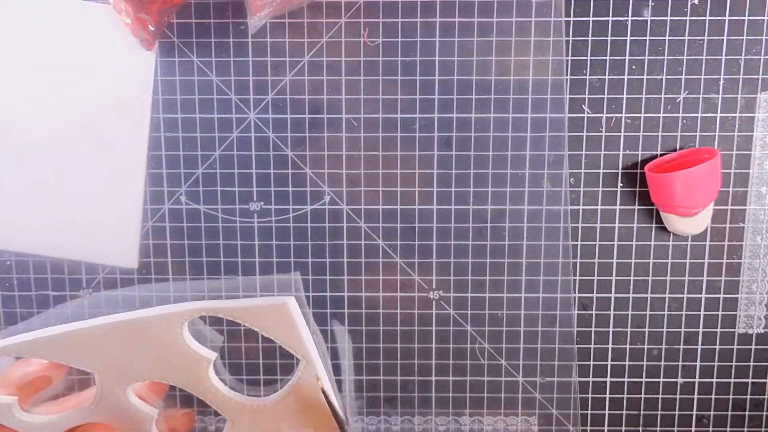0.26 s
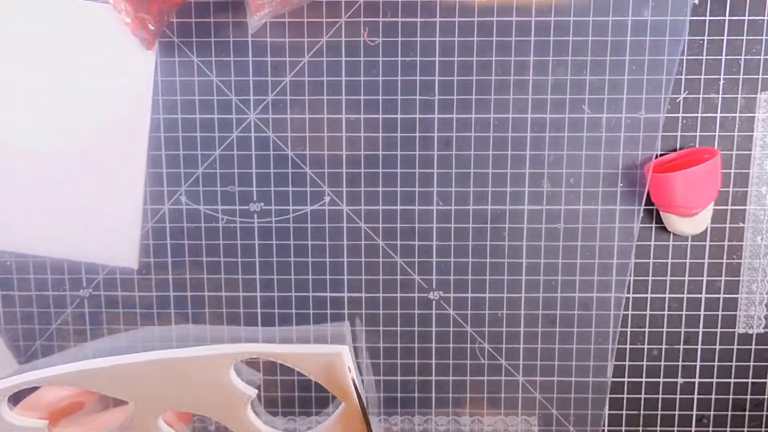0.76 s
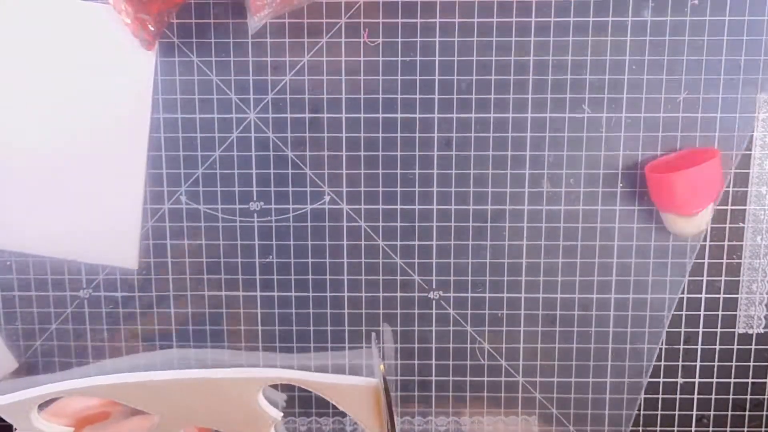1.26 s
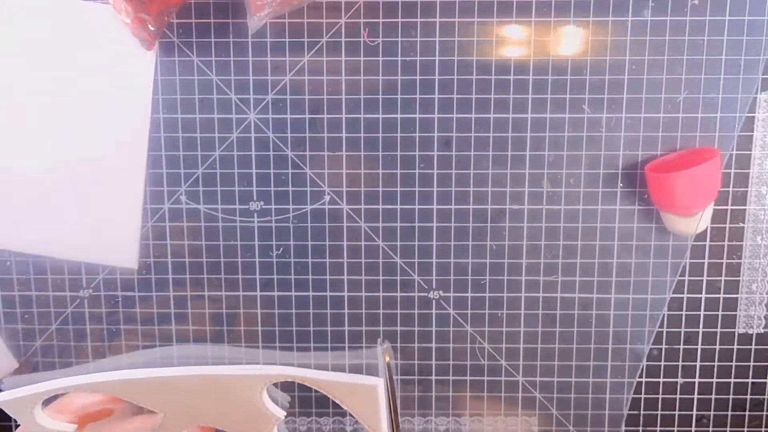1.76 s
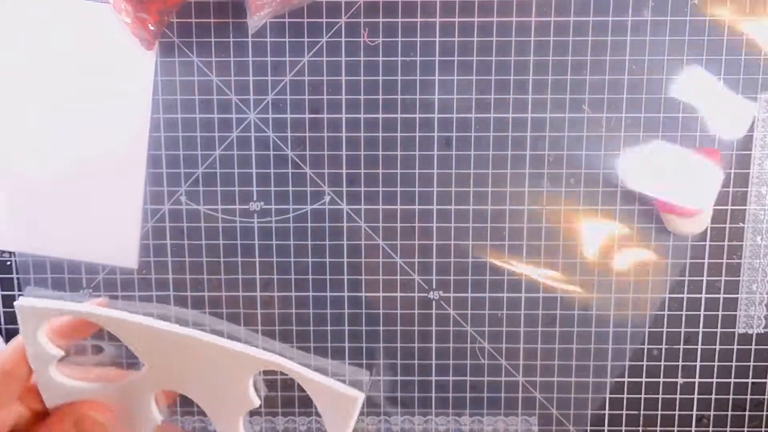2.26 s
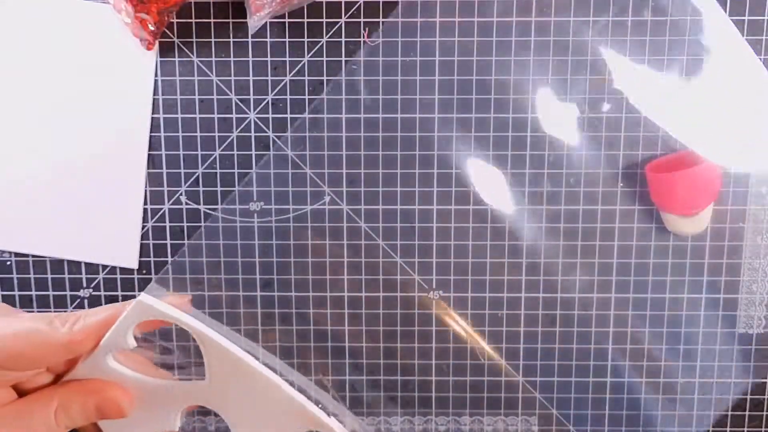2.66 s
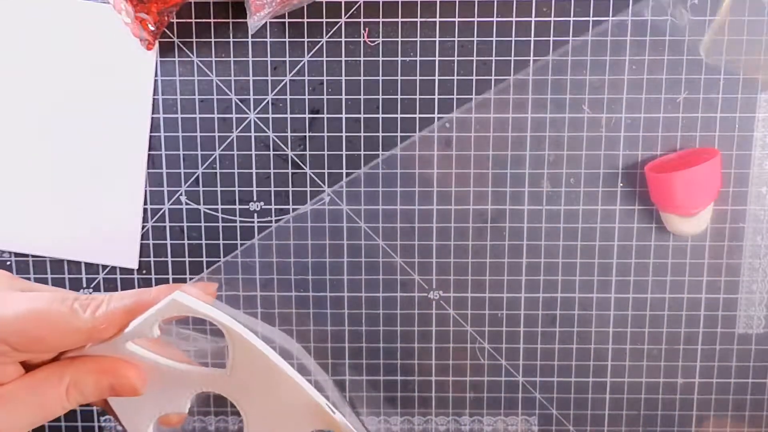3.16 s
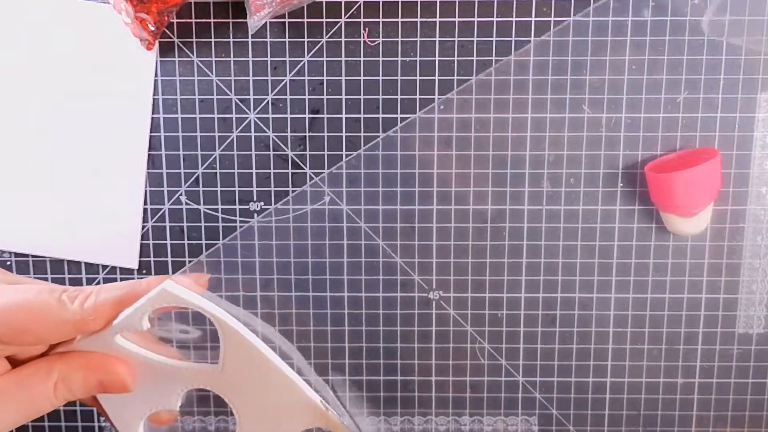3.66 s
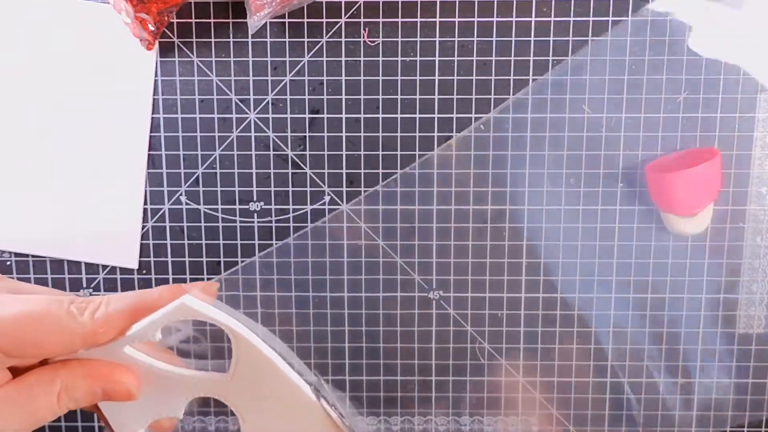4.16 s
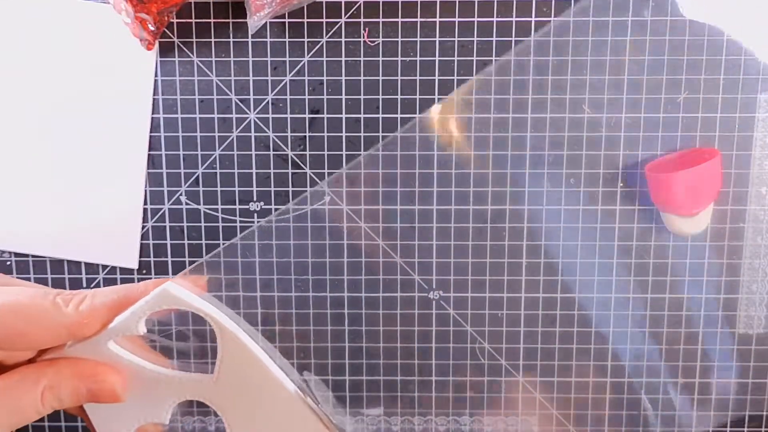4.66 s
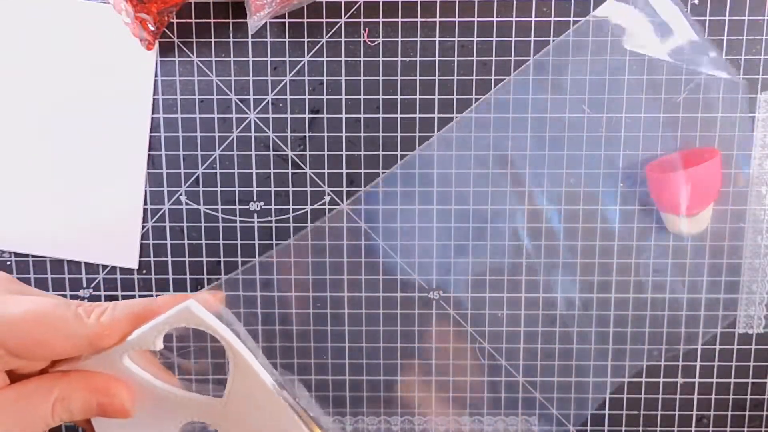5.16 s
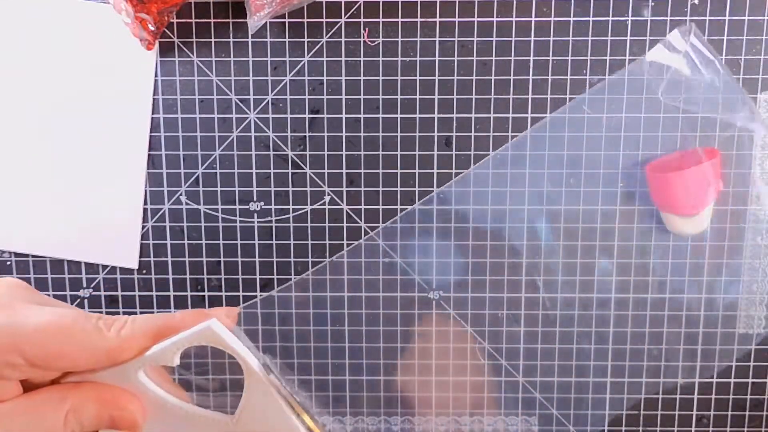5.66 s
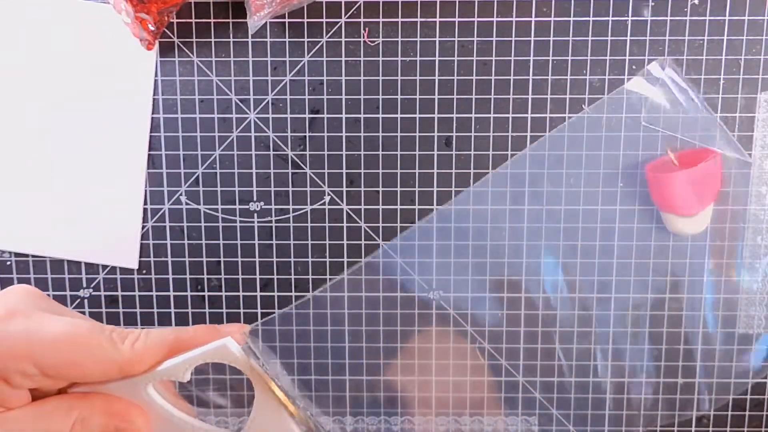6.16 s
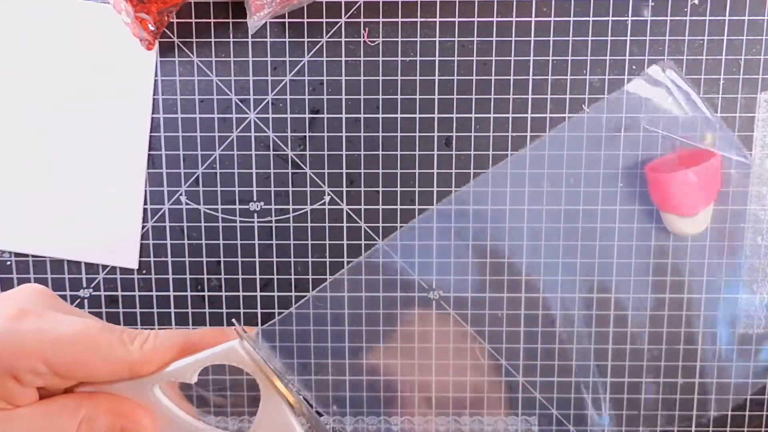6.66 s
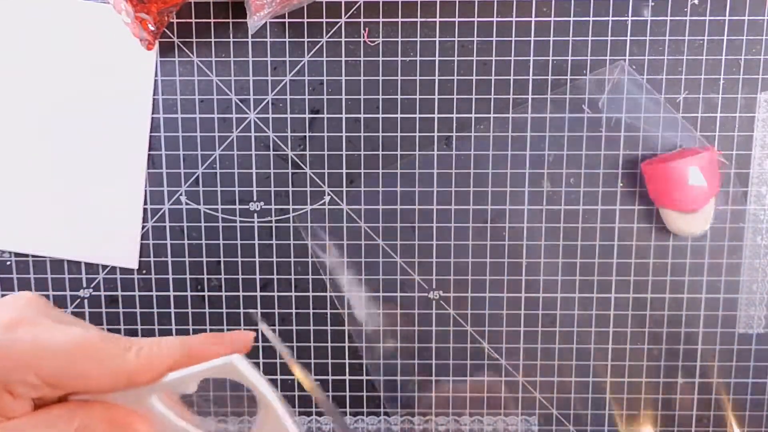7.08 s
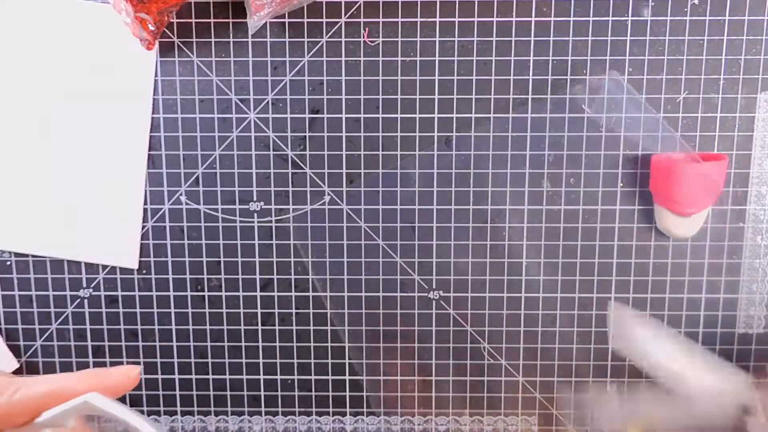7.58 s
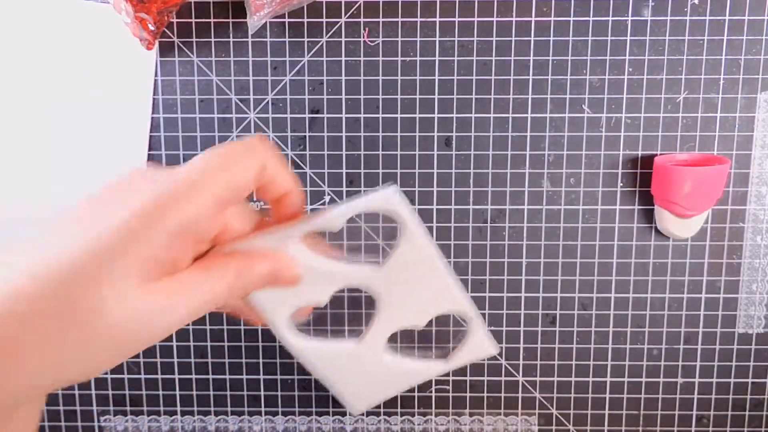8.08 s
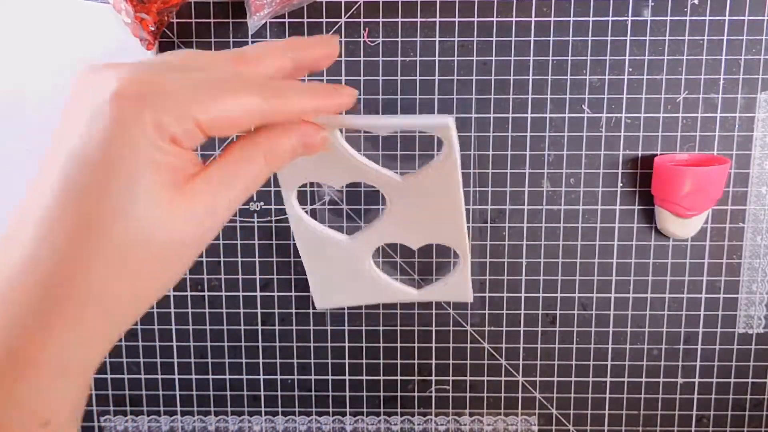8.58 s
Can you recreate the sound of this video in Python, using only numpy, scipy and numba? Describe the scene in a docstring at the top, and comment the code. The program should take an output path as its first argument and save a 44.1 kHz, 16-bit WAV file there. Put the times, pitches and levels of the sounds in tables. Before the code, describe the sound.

Close, crisp snips cut a crackly plastic sheet, with buckling pops between strokes, a final sharp snap, handle knocks and sliding card.

```python
"""Close to the microphone, scissors trim a stiff clear plastic sheet along a card's edge on a craft table.
At first the sheet lies on the mat, then it is lifted and buckles: each stroke is a run of short noise bursts
for the cracks over grainy friction, and between strokes the blades slide, catch and snap as shaped noise.
After the last snap the scissors knock down, and the card is slid over the mat and picked up.
Ringing modes give blades, handles and table; a small furnished room and faint room noise lie behind."""
import sys
import numpy as np
from scipy import signal
from scipy.fft import rfft, irfft
from scipy.io import wavfile
from scipy.ndimage import map_coordinates
from numba import njit

SR = 44100
rng = np.random.default_rng(int(sys.argv[2]) if len(sys.argv) > 2 else 0)


def store_wav(level_fs):
    """Save 16-bit WAV to argv[1]."""
    pcm = np.round(np.clip(np.atleast_2d(level_fs), -1, 1) * 32767)
    wavfile.write(sys.argv[1], SR, pcm.T.astype(np.int16))


N = 388951
TIME = np.arange(N) / SR  # seconds

# Event levels are set at the source, ahead of its ringing, the table, the room and the microphone gains.
# Body dB and edge dB raise or lower the lows and the highs of a contact's colour.

# The loudest splits of the plastic. Each row: start in seconds, level in dB, brightness in dB.
CRACKS = [(0.222, -47.5, 3), (0.267, -38, -11), (0.292, -51.5, 1), (0.301, -55, 9), (0.323, -33, -46),
          (0.339, -45, -9), (0.377, -50, -16), (0.399, -36, -17), (0.426, -33, -11), (0.439, -34, -2),
          (0.451, -30, -10), (0.47, -41, -3), (0.48, -43, -6), (0.792, -44.5, -5), (0.81, -50, 0),
          (0.859, -49, 10), (0.868, -44.5, 10), (0.889, -41, -12), (0.897, -52, -5), (0.909, -58, -3),
          (0.925, -41.5, 7), (0.959, -39, 6), (0.973, -38.5, 22), (0.991, -33, 7), (1.012, -34, -7),
          (1.027, -32, -1.5), (1.041, -33, -2), (1.06, -44, -3), (1.456, -39.5, 6), (1.48, -47, 2),
          (1.511, -33.5, -14), (1.524, -35, -6.5), (1.56, -38, 1), (1.735, -27, 5.5), (1.745, -27, -5),
          (1.75, -35.5, -7), (1.779, -31, 5), (1.797, -28, -2), (1.804, -37.5, 18), (1.812, -34.5, 9),
          (1.815, -31.5, -13), (1.831, -40.5, -1.5), (1.94, -50, -25), (1.988, -39, -35),
          (3.595, -47.5, -8), (3.621, -47, -4), (3.642, -45, 0), (3.665, -43, -2), (3.678, -42, 5),
          (3.699, -39.5, 0), (3.715, -47, 6), (3.732, -33, 7), (3.747, -31.5, 2), (3.764, -32, 0),
          (3.786, -34.5, 1), (3.799, -29, -5.5), (3.81, -44, -2), (3.824, -32.5, -12), (3.838, -55, -1),
          (4.489, -33, 6), (4.495, -42, 7), (4.516, -34, -22), (4.523, -41, -5), (4.535, -31, -1),
          (4.554, -39, 14), (4.563, -41, -10), (4.579, -29, 1), (4.583, -44, -8), (4.595, -33, -10),
          (4.605, -36.5, -2), (4.616, -31, 6), (4.629, -34.5, 7), (4.639, -42.5, 4), (4.989, -42, -10),
          (5.001, -36.5, 1), (5.046, -34, -4), (5.053, -31, -3), (5.065, -28, -0.5), (5.078, -31, 7),
          (5.083, -29.5, 2), (5.094, -28.5, 4), (5.111, -29.5, 1), (5.126, -37, 0), (5.132, -27.5, 4),
          (5.143, -33, 1), (5.151, -39.5, 6), (5.161, -46, 12), (5.615, -44.5, 11.5), (5.637, -48, 12),
          (5.678, -37.5, 11), (5.703, -37, 1), (5.718, -32, -1), (5.733, -29, 6), (5.747, -29, 4),
          (5.768, -27.5, 1), (6.142, -35.5, 1), (6.164, -40.5, -4), (6.175, -37, 10), (6.187, -35.5, -1),
          (6.213, -37, 6), (6.227, -33, 3), (6.239, -33.5, 7), (6.25, -34.5, 0), (6.265, -36.5, 8),
          (6.279, -41, 0), (6.291, -38.5, 12), (6.314, -43, 7), (6.654, -32.5, 6), (6.676, -37, 10.5),
          (6.686, -41, 11.5), (6.704, -34.5, 2), (6.726, -34.5, 3), (6.738, -40.5, 13.5), (6.758, -33, 2),
          (6.781, -53, -5), (6.884, -23.5, 4), (6.908, -45, -3.5), (6.938, -31.5, -6), (6.964, -32, -4),
          (6.977, -36, 10), (6.984, -12.5, 14)]
# Closing strokes of the scissors. Each row: start in seconds, length in seconds, first level in dB,
# last level in dB, body in dB, edge in dB.
STROKES = [(0.071, 0.39, -58.5, -41.5, 7, -8.5), (0.802, 0.22, -60, -38, 9, -5.5),
           (1.476, 0.24, -52.5, -74.5, 6.5, -1), (1.734, 0.088, -50.5, -37.5, -4, -6),
           (1.983, .12, -50.5, -42.5, 6, -17), (3.592, 0.25, -53, -45.5, 4, 0),
           (4.484, 0.13, -47.5, -46, 10.5, 0), (5.036, 0.11, -42, -44, 1, -5),
           (5.697, 0.076, -37, -42.5, -3.5, -4), (6.154, 0.14, -46.5, -34.5, -6.5, -4),
           (6.654, 0.125, -43, -48, -10.5, -6), (6.877, 0.11, -54, -35.5, -14, 3.5)]
# The blade edges catch on each other and ring. Each row: start in seconds, level in dB.
TICKS = [(0.644, -43), (1.388, -51), (1.408, -52), (1.55, -43.5), (1.569, -47), (1.588, -47.5),
         (1.625, -52), (1.633, -48), (1.668, -48), (1.676, -49)]
# Blades slide along each other, the cut edge and the mat. Each row: fastest moment in seconds,
# rise in seconds, fall in seconds (each spans 20 dB), level in dB, body in dB, edge in dB.
SLIDES = [(0.606, 0.032, 0.05, -38.5, -13, 1), (0.648, 0.025, 0.043, -46.5, -3, 8.5),
          (0.683, 0.015, 0.022, -35.5, -5.5, 4), (1.188, 0.039, 0.067, -34.5, -1, -3),
          (2.095, 0.12, 0.032, -39.5, -5, -1), (2.103, 0.018, 0.016, -37, -18, 8),
          (2.251, 0.1, 0.055, -44.5, -1.5, -5), (5.327, 0.096, 0.053, -32, -3, -4.5),
          (5.56, 0.04, 0.12, -42.5, -3.5, -6.5), (5.80, 0.023, 0.066, -41.5, -34, -9),
          (5.954, 0.11, 0.064, -30.5, -7, -7), (6.467, 0.08, 0.039, -35.5, -6.5, -9.5),
          (7.277, 0.02, 0.043, -47.5, -5.5, 3), (7.813, 0.09, 0.041, -36.5, -18, 1.5)]
# The blades snap shut. Each row: start in seconds, level in dB, burst length in seconds, body in dB, edge in dB.
SNAPS = [(0.685, -22.5, 0.0019, -5.5, -18), (1.182, -18.5, 0.00055, -1, 11), (2.097, -27.5, 0.0086, 4, 17),
         (6.986, -24, 0.0012, -4, 2.5)]
# The scissors are handled and put down. Each row: start in seconds, level in dB, burst length in seconds,
# body in dB, edge in dB.
KNOCKS = [(7.096, -24.5, 0.0012, -3, 6.5), (7.109, -26.5, 0.002, -6, 5), (7.115, -18.5, 0.0025, -1.5, -9),
          (7.171, -28.5, 0.0012, 5.5, -38), (7.244, -41.5, 0.0067, 2, 1), (7.386, -52, 0.0016, 17, 2),
          (7.539, -42.5, 0.00074, -10, -3), (7.561, -44.5, 0.0021, 2, -5), (7.662, -36, 0.0013, 7, -32),
          (7.678, -38.5, 0.0034, 21, -12), (7.724, -43.5, 0.0033, 14, -6), (7.764, -41, 0.003, 3, -2)]
# The sheet buckles and flips. Each row: start in seconds, level in dB, burst length in seconds,
# body in dB, edge in dB.
POPS = [(0.595, -49, 0.002, 22, -2), (0.609, -42, 0.0011, 21, 2), (0.628, -41, 0.002, 36, -2),
        (2.342, -29.5, 0.016, 19, -22), (2.786, -45, 0.0017, 12, 9), (2.831, -52, 0.0012, -4, -14),
        (2.862, -46.5, 0.0011, -11, 6), (3.903, -45, 0.0042, 9, -12), (3.952, -39.5, 0.0022, 17, 17),
        (4.099, -29, 0.0055, 6.5, 23), (4.106, -22.5, 0.0036, 8.5, 2), (4.162, -37, 0.0031, 9, -8),
        (4.204, -22.5, 0.00085, 11.5, -3), (4.234, -27.5, 0.0022, 5.5, 7), (4.307, -27.5, 0.0017, 2.5, 19),
        (4.441, -44.5, 0.0031, 8, -22.5), (4.756, -22.5, 0.0026, 19, -52), (4.966, -49.5, 0.0012, 10, -10),
        (5.289, -37.5, 0.0013, 15.5, 8), (5.428, -32.5, 0.0004, 3, 6), (5.464, -36.5, 0.0027, 20, 9),
        (5.499, -38.5, 0.0019, -17, 6), (5.538, -46, 0.00074, -20, 0), (5.913, -38, 0.0004, 7, 5),
        (6.07, -47, 0.001, 7, -6), (6.993, -36, 0.012, 9.5, 2)]
# Sheet and card are pushed over the mat. Each row: start in seconds, length in seconds, first level in dB,
# last level in dB, body in dB, edge in dB.
DRAGS = [(2.334, 0.12, -41.5, -37, -1.5, -8), (2.531, 0.18, -35.5, -39.5, -1.5, -11.5),
         (2.76, 0.16, -63.5, -49, 4.5, -13), (3.025, 0.087, -48.5, -43, -5.5, -16),
         (3.184, 0.36, -55, -56.5, -1, -14), (3.963, 0.03, -35, -42, 1, -19),
         (4.112, 0.25, -45.5, -49, 1, -8.5), (4.769, 0.058, -42, -38, 5.5, -12),
         (5.427, 0.081, -49, -48, -1.5, -9), (5.99, 0.14, -49.5, -66, 8.5, -25),
         (6.336, 0.56, -52, -52.5, -5, -13.5), (7.02, 0.31, -39.5, -61.5, -6, -6.5),
         (7.56, .15, -56.5, -46.5, -8, 1), (8.132, 0.13, -31, -35.5, -9, -2.5),
         (8.332, 0.025, -36.5, -37, -10.5, -3.5), (8.401, 0.052, -42.5, -34, -16, -1.5),
         (8.482, 0.1, -35, -43.5, -7, -3.5)]
# Card and plastic glide smoothly over each other. Each row: start in seconds, length in seconds,
# first level in dB, last level in dB, body in dB, edge in dB.
SWISHES = [(2.921, 0.021, -27, -23, -29, -7.5), (2.948, 0.076, -27.5, -28.5, -18.5, -11),
           (8.595, .22, -53, -51.5, -9.5, -1.5)]
# Edges of card and sheet catch and tap on the mat. Each row: start in seconds, level in dB,
# burst length in seconds, body in dB, edge in dB.
TAPS = [(2.926, -27.5, 0.0005, -11, -16), (8.073, -42.5, 0.002, 1, -5), (8.099, -29.5, 0.002, -8.5, -16),
        (8.124, -30, 0.0023, 6.5, 2.5), (8.139, -33, 0.0023, 18, -15), (8.154, -31.5, 0.001, 12, 22),
        (8.175, -41, 0.001, 10, 19), (8.214, -30, 0.0016, -6, -7), (8.283, -33, 0.017, -1, -3),
        (8.467, -22, 0.0058, -7, -3), (8.515, -29, 0.0025, 7.5, -2), (8.551, -40, 0.002, 6, -13),
        (8.591, -42, 0.01, -23, 2), (8.605, -42.5, 0.005, -20, -3), (8.8, -45.5, 0.0016, -12, -3)]
# An edge scrapes and the sheet resonates. Each row: loudest moment in seconds, length in seconds,
# first pitch in Hz, last pitch in Hz, level in dB.
SCRAPES = [(0.611, 0.047, 740, 680, -35.5), (2.413, 0.043, 3760, 2840, -36), (2.465, 0.079, 830, 507, -41),
           (2.576, 0.028, 660, 880, -35), (2.665, 0.045, 2740, 3180, -37),
           (5.263, 0.028, 2350, 2180, -42.5), (5.328, 0.034, 3700, 3200, -29),
           (5.546, 0.034, 3360, 3200, -37), (7.797, 0.071, 1490, 2090, -40), (7.84, 0.049, 3680, 3280, -39),
           (8.148, 0.08, 730, 597, -38), (8.53, 0.023, 1240, 900, -33), (8.536, 0.066, 626, 565, -38.5)]
# Hands and scissors bump the table. Each row: start in seconds, peak level in dB.
BUMPS = [(0.686, -26.5), (1.236, -30.5), (2.081, -37.5), (2.151, -38.5), (2.336, -27.5), (2.895, -35),
         (3.956, -31.5), (4.754, -32), (5.277, -34.5), (5.487, -34.5), (6.017, -33), (6.169, -32.5),
         (6.3, -41.5), (6.691, -37.5), (7.171, -48), (7.667, -37), (8.464, -36)]

# Colour of cutting while the sheet lies on the mat. Each row: frequency in Hz, level in dB.
LAID_TONE = [(60, -15), (130, -10), (250, 8.5), (450, 1), (750, -3.5), (1150, -5.5), (1650, -7), (2400, -6),
             (3400, -14), (4800, -9.5), (7000, -18.5), (10000, -25.5), (15000, -49)]
# Colour of cutting the lifted sheet. Each row: frequency in Hz, level in dB.
LIFTED_TONE = [(60, -19), (130, -14.5), (250, 0), (450, -3), (750, 0.5), (1150, 0), (1650, -3), (2400, 0.5),
               (3400, -6.5), (4800, -9.5), (7000, -16), (10000, -28.5), (15000, -46)]
# Colour of the buckling sheet. Each row: frequency in Hz, level in dB.
POP_TONE = [(60, -27), (130, -18), (250, 1), (450, -4.5), (750, 1.5), (1150, 3), (1650, 3), (2400, 0),
            (3400, -3.5), (4800, -18.5), (7000, -31.5), (10000, -37.5), (15000, -72.5)]
# Colour of the blades snapping shut. Each row: frequency in Hz, level in dB.
SNAP_TONE = [(60, -5), (130, -21.5), (250, 6), (450, 2), (750, -10), (1150, -23.5), (1650, -9.5),
             (2400, -17.5), (3400, -2.5), (4800, 5), (7000, -3), (10000, -16), (15000, -50.5)]
# Colour of the scissors being handled. Each row: frequency in Hz, level in dB.
KNOCK_TONE = [(60, -27.5), (130, -8), (250, 2.5), (450, -4.5), (750, -8.5), (1150, -5), (1650, 11),
              (2400, -0.5), (3400, -3.5), (4800, -14), (7000, -16.5), (10000, -21.5), (15000, -63.5)]
# Colour of edges tapping the mat. Each row: frequency in Hz, level in dB.
TAP_TONE = [(60, -11), (130, 2), (250, 1), (450, -8), (750, -2), (1150, 5), (1650, -1.5), (2400, 1.5),
            (3400, 2.5), (4800, 5), (7000, -7.5), (10000, -18.5), (15000, -44)]
# Colour of sliding steel. Each row: frequency in Hz, level in dB.
SLIDE_TONE = [(60, -20.5), (215, -2), (440, -13), (750, -8), (1300, -10), (1900, -10.5), (2500, -11.5),
              (3500, -14), (5700, -11.5), (9500, -27), (15000, -65)]
# Colour of sheet and card on the mat. Each row: frequency in Hz, level in dB.
DRAG_TONE = [(60, -54.5), (200, -4), (400, 1.5), (650, -1), (1100, -0.5), (1700, 3), (2600, 0),
             (3600, -8.5), (5200, -8), (9500, -21.5), (15000, -44.5)]
# Colour of smooth faces gliding. Each row: frequency in Hz, level in dB.
SWISH_TONE = [(60, -23), (200, -13.5), (600, -12), (1100, -8), (1700, -7), (2600, 2), (3400, -3.5),
              (4500, -3), (6000, -12), (9500, -23), (15000, -56)]
# Colour of a bumped table. Each row: frequency in Hz, level in dB.
BUMP_TONE = [(25, -14), (50, -12), (85, -3), (140, 3.5), (220, 6), (400, -31), (1000, -63.5)]
# Colour of the room noise. Each row: frequency in Hz, level in dB.
QUIET_TONE = [(20, -12.5), (55, -1), (130, 1), (215, -1.5), (600, -9), (1150, -13), (1800, -13),
              (3500, -19), (5000, -19.5), (8000, -29), (15000, -34.5)]

# Ringing of the blades. Each row: frequency in Hz, 60 dB decay in seconds, level over the dry sound in dB.
BLADE_MODES = [(1584, 0.05, 6), (1760, 0.027, 1.5), (3300, 0.037, 2), (4480, 0.033, 4), (5180, 0.033, 0),
               (5590, 0.075, -13), (6000, .05, -13), (7260, 0.068, -5.5), (8500, .06, -2), (9740, 0.096, 0)]
# Ringing of the handles. Each row: frequency in Hz, 60 dB decay in seconds, level over the dry sound in dB.
HANDLE_MODES = [(1525, 0.035, -6), (1615, .04, -5), (2250, 0.02, -5), (2740, .04, -3), (3080, .04, -2)]
# Ringing of the table. Each row: frequency in Hz, 60 dB decay in seconds, level over the dry sound in dB.
TABLE_MODES = [(212, 0.16, -8), (252, 0.18, -12), (543, .08, -7), (618, 0.11, -1.5), (709, 0.12, -6),
               (888, 0.09, -7)]
# Bending resonances of the sheet. Each row: frequency in Hz, width in Hz, level in dB.
SHEET_MODES = [(930, 120, -6.5), (1820, 370, -3), (2304, 210, 7), (3410, 650, 3.5)]
# Echoes of the room. Each row: frequency in Hz, 60 dB decay in seconds, echo level in dB.
ROOM = [(101.5, 0.67, 1.5), (177, 0.26, -2), (250, 0.19, -6), (709, 0.17, -7.5), (1454, 0.11, -9.5),
        (4400, 0.12, -17), (9930, 0.087, -11.5)]
# How much the two microphone ports differ. Each row: frequency in Hz, level in dB.
WIDTH = [(60, -25.5), (200, -28), (600, -31.5), (1500, -28), (3000, -18.5), (6000, -9.5), (11000, -2.5),
         (15000, -1.5)]

LIFT_S = 3  # from here on the sheet is cut off the mat
CRACK_S, CRACK_USUAL_DB, CRACK_HALVING_DB = 0.0034, -28, 29.5  # a usual crack's length; louder ones are over sooner
SPLIT_JUMP_S, SPLIT_CHIP_S = 0.0012, 0.0005  # usual wait between the jumps of a split; decay of one jump
STROKE_ATTACK_S, STROKE_RELEASE_S = 0.0049, 0.027  # time for 20 dB
STROKE_CURVE = 1.8  # the level changes fastest as the cut nears the tips
TICK_S, TICK_BODY_DB = 0.0026, 1.5
SLIDE_ROUNDNESS = 1.23  # 1 = a pointed swell, 2 = a bell
DRAG_ATTACK_S, DRAG_RELEASE_S = 0.036, 0.041  # time for 20 dB
SWISH_ATTACK_S, SWISH_RELEASE_S = 0.0096, 0.0067  # time for 20 dB
SCRAPE_WIDTH, SCRAPE_FADE_DB = 0.49, 10  # width as a share of the pitch; fall at either end
SHEET_RING_S, HANDLE_RING_S = 0.009, 0.005  # decay of the flutter
BODY_HZ, EDGE_HZ = 1050, 3700  # body lies below, edge above
BODY_FADE_DB, EDGE_FADE_DB = 18.5, 31  # what body and edge lose while the middle loses 20 dB
QUIET_DB = -63.5  # room noise ahead of the microphone gains
TOP_HZ = 15000  # upper limit of the recorder


def cutting():
    """The blades crunch through the plastic: boomy on the mat, brighter once the sheet is lifted."""
    laid = ring(cutting_on_mat(), BLADE_MODES, db=2.0)
    lifted = ring(cutting_lifted(), BLADE_MODES, db=-7.5)
    return laid + lifted


def cutting_on_mat():
    """Splits and tearing friction of the sheet on the mat excite a low flapping resonance."""
    cut = splits(cracks(lifted=False), LAID_TONE, flutter_db=-12, flutter_s=SHEET_RING_S, flutter_hz=1800)
    tearing = grains(rate=500, spread_db=3.0, hiss_db=-8)
    tearing *= stutter(rate=65, decay_s=0.0039, spread_db=4.0, steady_db=-7.5)
    cut += rub(strokes(lifted=False), tearing, LAID_TONE)
    return flap(cut, hz=356, width_hz=100, db=-0.5, sway_db=-2.0)


def cutting_lifted():
    """Splits and tearing friction of the lifted sheet excite a higher, narrower flapping resonance."""
    cut = splits(cracks(lifted=True), LIFTED_TONE, flutter_db=-14, flutter_s=SHEET_RING_S, flutter_hz=1110)
    tearing = grains(rate=600, spread_db=0.5, hiss_db=-17.5)
    tearing *= stutter(rate=130, decay_s=0.0011, spread_db=5.0, steady_db=-16.5)
    cut += rub(strokes(lifted=True), tearing, LIFTED_TONE)
    return flap(cut, hz=778, width_hz=67, db=4.5, sway_db=3.0)


def cracks(lifted):
    """The splits before or after the lift: loud ones are shorter, bright ones trade body for edge."""
    rows = []
    for s, db, bright_db in CRACKS:
        if (s >= LIFT_S) == lifted:
            burst_s = CRACK_S * 2 ** ((CRACK_USUAL_DB - db) / CRACK_HALVING_DB)
            rows.append((s, db, burst_s, -bright_db / 2, bright_db / 2))
    return rows


def splits(rows, tone, flutter_db, flutter_s, flutter_hz, first_db=-12, uneven_db=3.5, colour_db=2,
           count=7, size=4096):
    """A split opens with one sharp fracture, runs on in smaller jumps and leaves the sheet fluttering low down."""
    out, t = np.zeros(N), TIME[:size]
    bending = signal.butter(2, flutter_hz, fs=SR, output="sos")
    for s, db, burst_s, body_db, edge_db in rows:
        chance = rng.standard_normal((5, size))
        waits = SPLIT_JUMP_S * np.exp(chance[0, :count] / 2)
        jumps = np.append(0, np.cumsum(waits))
        force = undb(first_db) * unit(1. * (t == 0))
        for at, luck in zip(jumps, chance[1]):
            chip = (t >= at) * chance[2] * np.exp(-np.abs(t - at) / SPLIT_CHIP_S)
            force = force + unit(chip) * undb(uneven_db * luck) * np.exp(-at / burst_s)
        flutter = signal.sosfilt(bending, chance[3] * np.exp(-t / flutter_s))
        force = unit(force) + undb(flutter_db) * unit(flutter)
        sound = through(force, response(varied(tone, colour_db, chance[4]), body_db, edge_db))
        add(out, s, sound * undb(db) / np.sqrt(np.mean(sound[:SR // 100] ** 2)))  # level over the first 10 ms
    return out


def strokes(lifted):
    """The closing strokes before or after the lift."""
    rows = [row for row in STROKES if (row[0] >= LIFT_S) == lifted]
    return [push(row, STROKE_ATTACK_S, STROKE_RELEASE_S, STROKE_CURVE) for row in rows]


def flap(x, hz, width_hz, db, sway_db):
    """A free stretch of the sheet rings on after each jolt; its pitch shifts as the blades move on."""
    return x + undb(db) * bandpass(x, hz * waver(18, sway_db), float(width_hz))


def scissors():
    """Steel slides along steel and the cut edge, catches and snaps shut; the handles knock when put down."""
    tick_rows = [(s, db, TICK_S, TICK_BODY_DB, 0) for s, db in TICKS]
    ticks = blows(tick_rows, LAID_TONE, first_db=-10, flutter_db=-6, flutter_s=0.0059)
    snaps = blows(SNAPS, SNAP_TONE, first_db=-5.0, flutter_db=-17.5, flutter_s=0.0073, strain_db=-26.0)
    knocks = blows(KNOCKS, KNOCK_TONE, first_db=-9.5, flutter_db=-26.5, flutter_s=HANDLE_RING_S, strain_db=-39.0)
    blades = ring(ticks, BLADE_MODES, db=7) + ring(snaps, BLADE_MODES, db=3.0)
    return slides() + blades + ring(knocks, HANDLE_MODES, db=1.5)


def slides():
    """Dense friction slips swell as the blades speed up and slow down, through gliding sheet resonances."""
    slips = grains(rate=1300, spread_db=2.5, hiss_db=-10.5) * waver(rate=280, depth_db=2.5)
    slips = flex(slips, rate=45, bend_db=1.5, plain_db=-5.5)
    return rub(map(swell, SLIDES), slips, SLIDE_TONE)


def sheet():
    """Sheet and card rasp and glide, buckle with a ringing pop and tap down."""
    pops = blows(POPS, POP_TONE, first_db=-2.5, flutter_db=-4.0, flutter_s=0.013, strain_db=-44, rise_s=0.00086)
    pops = flap(pops, hz=930, width_hz=210, db=0.5, sway_db=0.5)
    taps = blows(TAPS, TAP_TONE, first_db=1.0, flutter_db=-0.5, flutter_s=0.014, strain_db=-50.0)
    return drags() + swishes() + pops + taps


def drags():
    """Sheet and card stick and slip over the mat in fits and starts."""
    slips = grains(rate=1000, spread_db=0.5, hiss_db=-7)
    slips *= stutter(rate=25, decay_s=0.012, spread_db=-6.0, steady_db=-5.0)
    slips = flex(slips, rate=24, bend_db=1.55, plain_db=-6.0)
    return rub([push(row, DRAG_ATTACK_S, DRAG_RELEASE_S) for row in DRAGS], slips, DRAG_TONE)


def swishes():
    """Smooth faces glide: very dense slips that stop as soon as the faces part."""
    slips = grains(rate=5000, spread_db=3.5, hiss_db=-1.5)
    return rub([push(row, SWISH_ATTACK_S, SWISH_RELEASE_S) for row in SWISHES], slips, SWISH_TONE)


def scrapes(rate=1100):
    """A sliding edge rings one resonance of the sheet, which glides as the free length changes."""
    out = np.zeros(N)
    slips = grains(rate, spread_db=0.5, hiss_db=-19.5)
    slips *= stutter(rate=63, decay_s=0.0074, spread_db=7.0, steady_db=5)
    for s, length, first_hz, last_hz, db in SCRAPES:
        span = slice(*np.searchsorted(TIME, [s - length, s + length]))
        t = (TIME[span] - s) / length
        hz = first_hz * (last_hz / first_hz) ** (t + .5)
        width = SCRAPE_WIDTH * np.sqrt(first_hz * last_hz)
        tone = bandpass(bandpass(slips[span], hz, width), hz, width)
        out[span] += unit(tone) * undb(db - SCRAPE_FADE_DB * (2 * t) ** 2)
    return out


def bumps(decay_s=0.0052, size=8192):
    """Soft, dull thuds of the table top: fading noise through a low colour."""
    out, t = np.zeros(N), TIME[:size]
    for s, db in BUMPS:
        thud = through(rng.standard_normal(size) * np.exp(-t / decay_s), response(BUMP_TONE))
        add(out, s, thud / np.abs(thud).max() * undb(db))
    return out


def mat_echo(x, lag_s, db, sway_db):
    """The table reflects the sound a moment later; the lag shifts as the hands move."""
    lag = lag_s * SR * waver(1.8, sway_db)
    echo = map_coordinates(x, [np.arange(N) - lag], order=3)
    return (x + undb(db) * echo) / np.hypot(1, undb(db))


def room(x, build_s=.005):
    """A small furnished room: diffuse echoes build up quickly and the bass lingers longest."""
    t = TIME[:SR // 2]
    hz = np.fft.rfftfreq(len(t), 1 / SR)
    noise = rfft(rng.standard_normal(len(t)))
    centres = [row[0] for row in ROOM]
    h = 0
    for share, (_, t60, db) in zip(np.eye(len(ROOM)), ROOM):
        band = irfft(noise * along(list(zip(centres, share)), hz), len(t))  # neighbouring bands cross-fade
        fade = np.exp(-np.log(1000) * t / t60) * (1 - np.exp(-(t / build_s) ** 2))
        h = h + undb(db) * band * fade / np.linalg.norm(fade)
    return x + through(x, h)


def room_noise(db):
    """The faint, steady noise of the quiet room: coloured random noise."""
    return undb(db) * unit(through(rng.standard_normal(N), response(QUIET_TONE)))


def port_difference(mid):
    """Half the difference of the two ports: a briefly scattered copy of the sound, mostly treble."""
    scatter = rng.standard_normal(1024) * np.exp(-TIME[:1024] / .006)
    return through(through(mid, scatter / np.linalg.norm(scatter)), response(WIDTH))


def blows(rows, tone, first_db, flutter_db, flutter_s, strain_db=-12, strain_s=0.00088, rise_s=0.0001,
          uneven_db=5.5, colour_db=1.34, size=4096):
    """The material creaks under strain, gives in a burst of tiny fractures, then flutters on in bending waves."""
    lead = SR // 100  # room for the strain ahead of the blow, in samples
    out, t = np.zeros(N), TIME[:size] - TIME[lead]
    after = np.maximum(t, 0)
    for s, db, burst_s, body_db, edge_db in rows:
        chance = rng.standard_normal((3, size))
        strain = (t < 0) * chance[2] * np.exp(-np.abs(t) / strain_s)
        fractures = chance[0] * undb(uneven_db * chance[1])
        burst = fractures * (1 - np.exp(-after / rise_s)) * np.exp(-after / max(burst_s, 1e-4))
        flutter = (t >= 0) * chance[2] * np.exp(-after / flutter_s)
        force = undb(strain_db) * unit(strain) + undb(first_db) * unit(1. * (t == 0))
        force = force + unit(burst) + undb(flutter_db) * unit(flutter)
        sound = through(force, response(varied(tone, colour_db, chance[1]), body_db, edge_db))
        loudness = np.sqrt(np.mean(sound[lead:2 * lead] ** 2))  # over the first 10 ms
        add(out, s - lead / SR, sound * undb(db) / loudness)
    return out


def varied(tone, colour_db, shifts):
    """A colour with random shifts: no two contacts are quite alike."""
    return [(hz, tone_db + colour_db * shift) for (hz, tone_db), shift in zip(tone, shifts)]


def rub(moves, slips, tone):
    """Friction: slips sound through a material; each movement sets their body, middle and edge."""
    sound = through(slips, response(tone))
    level = np.zeros((3, N))
    for span, gains in moves:
        level[:, span] += gains
    bands = [(BODY_HZ, "low"), ([BODY_HZ, EDGE_HZ], "band"), (EDGE_HZ, "high")]
    parts = [signal.sosfilt(signal.butter(3, hz, kind, fs=SR, output="sos"), sound) for hz, kind in bands]
    return sum(gain * unit(part) for gain, part in zip(level, parts))


def push(row, attack_s, release_s, curve=1):
    """A held movement: it sets in, goes from its first level to its last and dies away."""
    s, length, first_db, last_db, body_db, edge_db = row
    span = slice(*np.searchsorted(TIME, [s - 4 * attack_s, s + length + 6 * release_s]))
    t = TIME[span] - s
    held_db = first_db + (last_db - first_db) * np.clip(t / length, 0, 1) ** curve
    slowed = np.maximum(-t, 0) / attack_s + np.maximum(t - length, 0) / release_s
    return span, dulled(held_db, body_db, edge_db, slowed)


def swell(row):
    """A movement that speeds up and slows down again."""
    s, rise_s, fall_s, db, body_db, edge_db = row
    span = slice(*np.searchsorted(TIME, [s - 4 * rise_s, s + 4 * fall_s]))
    slowed = np.maximum((s - TIME[span]) / rise_s, (TIME[span] - s) / fall_s) ** SLIDE_ROUNDNESS
    return span, dulled(db, body_db, edge_db, slowed)


def dulled(db, body_db, edge_db, slowed):
    """Gains of body, middle and edge: as a movement slows it gets quieter, the edge first and the body last."""
    body = db + body_db - BODY_FADE_DB * slowed
    middle = db - 20 * slowed
    edge = db + edge_db - EDGE_FADE_DB * slowed
    return undb([body, middle, edge])


def grains(rate, spread_db, hiss_db):
    """Tiny slips of uneven size at random moments, rate per second, over a smooth hiss."""
    size = undb(spread_db * np.minimum(rng.exponential(size=N), 4))
    slips = (rng.random(N) < rate / SR) * size * rng.choice([-1, 1], N)
    return unit(slips) + undb(hiss_db) * rng.standard_normal(N)


def stutter(rate, decay_s, spread_db, steady_db, rise_s=0.0051, count=2048):
    """Stick and slip: a gain that leaps up at uneven intervals and dies back to a steady share."""
    chance = rng.standard_normal((count, 2))
    starts = np.append(0, np.cumsum(np.exp(chance[1:, 0] / 2)) / rate)
    last = np.searchsorted(starts, TIME, side="right") - 1
    since = TIME - starts[last]
    height = undb(spread_db * np.clip(chance[last, 1], -2, 1))
    leap = height * (1 - np.exp(-since / rise_s)) * np.exp(-since / decay_s)
    return unit(leap + undb(steady_db))


def waver(rate, depth_db):
    """A factor that wanders at random within bounds, with rate turning points per second."""
    knots = rng.uniform(-np.sqrt(3), np.sqrt(3), 4096)  # rms 1
    return undb(depth_db * np.interp(TIME * rate, np.arange(len(knots)), knots))


def flex(x, rate, bend_db, plain_db):
    """The sheet's resonances glide as it bends, mostly together and a little each on its own."""
    bend = waver(rate, bend_db)
    out = undb(plain_db) * x
    for hz, width, db in SHEET_MODES:
        centre = np.minimum(hz * bend * waver(rate, bend_db / 2), SR / 4)
        out = out + undb(db) * bandpass(x, centre, float(width))
    return out


def ring(x, modes, db=0):
    """The sound plus the ringing that it excites in an object: one decaying cosine per mode."""
    t = TIME[:SR // 2]
    h = 0
    for hz, t60, mode_db in modes:
        decay = np.log(1000) / t60
        gain = undb(mode_db + db) * 2 * decay / SR
        h = h + gain * np.exp(-decay * t) * np.cos(2 * np.pi * hz * t)
    return x + through(x, h)


@njit
def bandpass(x, hz, width):
    """State-variable band-pass whose centre moves; gain 1 at the centre."""
    y, band, low = np.empty(len(x)), 0., 0.
    for i in range(len(x)):
        g, k = np.tan(np.pi * hz[i] / SR), width / hz[i]
        v = (band + g * (x[i] - low)) / (1 + g * (g + k))
        band, low, y[i] = 2 * v - band, low + 2 * g * v, k * v
    return y


def response(tone, body_db=0, edge_db=0, size=4096):
    """Causal impulse response of a colour, with its low body and its bright edge raised or lowered."""
    hz = np.fft.rfftfreq(size, 1 / SR)
    body = along([(BODY_HZ / np.sqrt(2), 1), (BODY_HZ * np.sqrt(2), 0)], hz)
    edge = along([(EDGE_HZ / np.sqrt(2), 0), (EDGE_HZ * np.sqrt(2), 1)], hz)
    cepstrum = irfft(np.log(undb(along(tone, hz) + body_db * body + edge_db * edge)))
    cepstrum[1:size // 2] *= 2  # folding the cepstrum gives minimum phase
    cepstrum[size // 2 + 1:] = 0
    return irfft(np.exp(rfft(cepstrum)))


def along(points, hz):
    """Read (Hz, value) points on a log-frequency axis."""
    f, value = np.transpose(points)
    return np.interp(np.log(np.maximum(hz, 1)), np.log(f), value)


def through(x, h):
    """Pass a sound through an impulse response."""
    return signal.oaconvolve(x, h)[:len(x)]


def add(out, s, sound):
    """Mix a short sound in at time s."""
    i = max(int(s * SR), 0)
    out[i:i + len(sound)] += sound[:max(N - i, 0)]


def unit(x):
    """Scale to rms 1."""
    return x / np.sqrt(np.mean(x ** 2) + 1e-20)


def undb(db):
    """Decibels to gain."""
    return 10 ** (np.asarray(db) / 20)


def scene():
    """All sounds ring the table and the room; the two ports hear nearly the same, apart from scattered treble."""
    close = cutting() + scissors() + sheet() + scrapes()
    close = mat_echo(close, lag_s=0.001396, db=-13.5, sway_db=1.5)
    mid = room(ring(close + bumps(), TABLE_MODES, db=-1.0)) * undb(-3.5)
    mid += room_noise(QUIET_DB) * waver(rate=3.7, depth_db=1)
    side = port_difference(mid)
    side += room_noise(QUIET_DB - 1.0)  # room noise comes from all round
    return np.array([(mid + side) * undb(2.5), (mid - side) * undb(2.0)])


def record(dry):
    """The recorder rounds the highest peaks and cuts the top."""
    top_cut = signal.ellip(8, .2, 70, TOP_HZ, fs=SR, output="sos")
    return signal.sosfilt(top_cut, np.tanh(dry))


dry = scene()
out = record(dry)
store_wav(out)
```